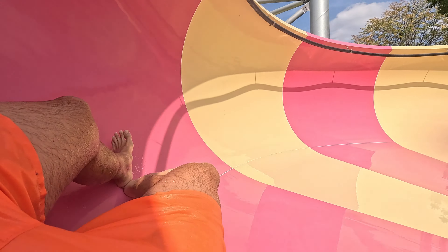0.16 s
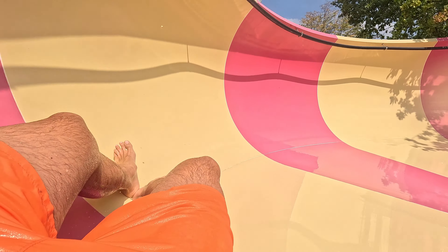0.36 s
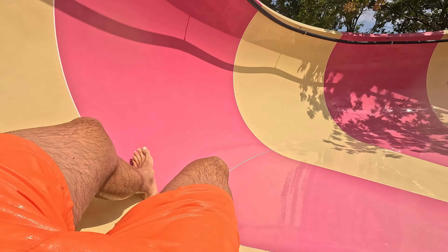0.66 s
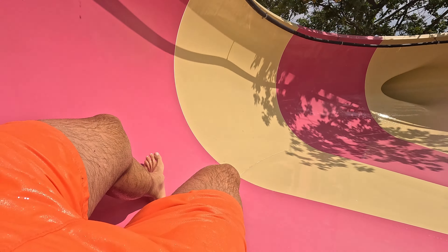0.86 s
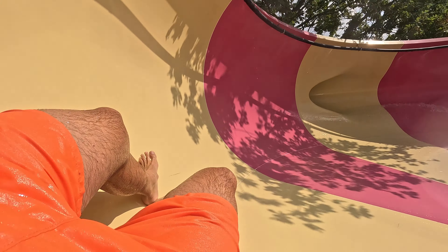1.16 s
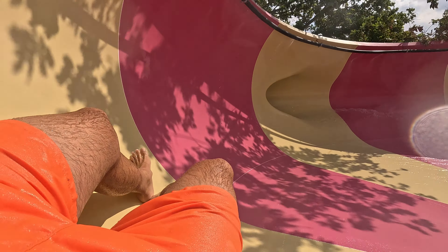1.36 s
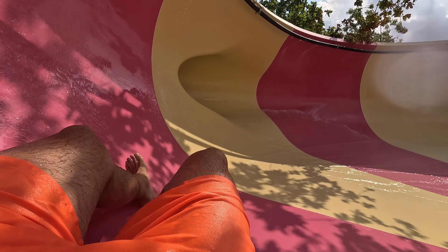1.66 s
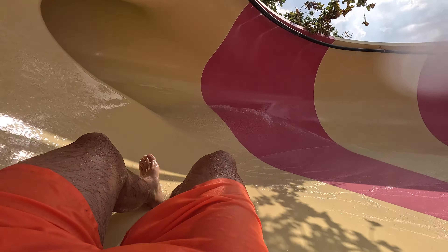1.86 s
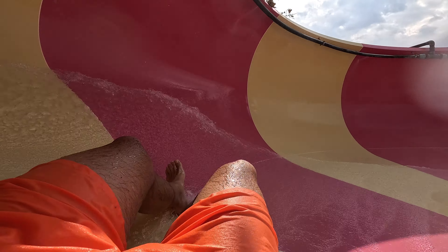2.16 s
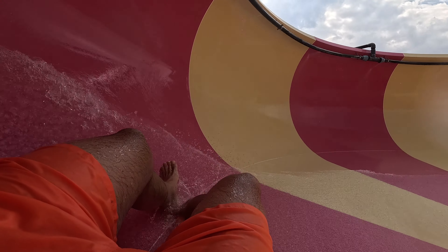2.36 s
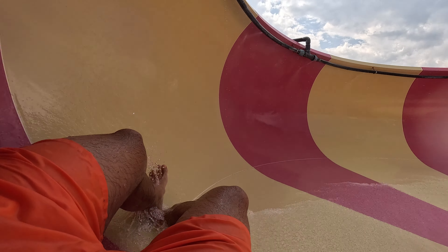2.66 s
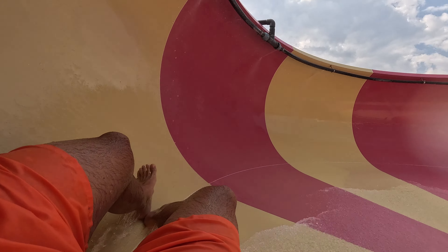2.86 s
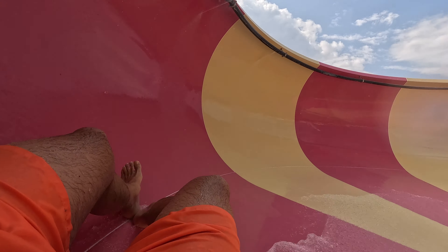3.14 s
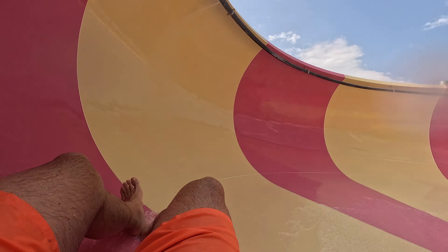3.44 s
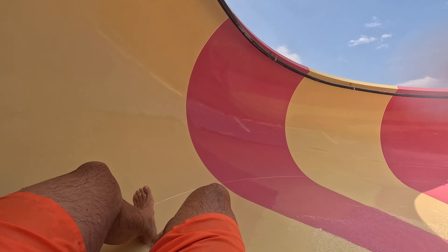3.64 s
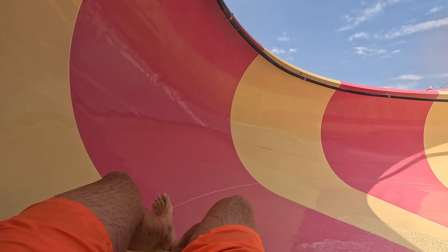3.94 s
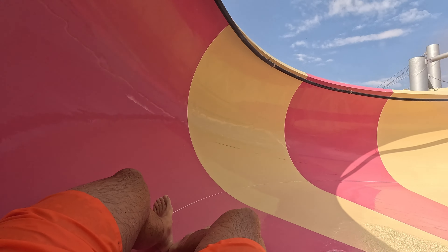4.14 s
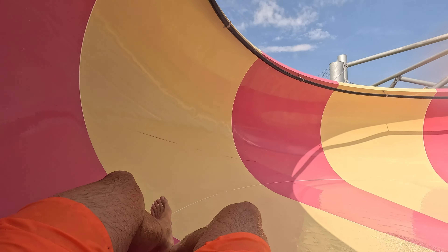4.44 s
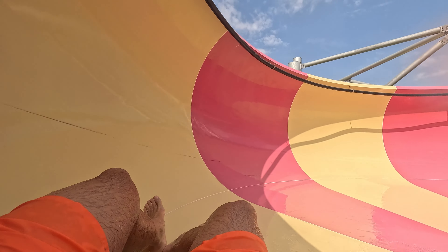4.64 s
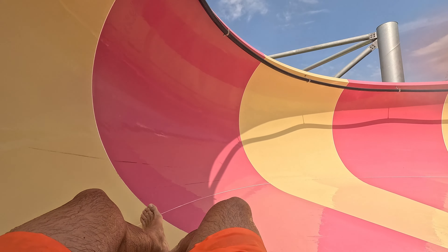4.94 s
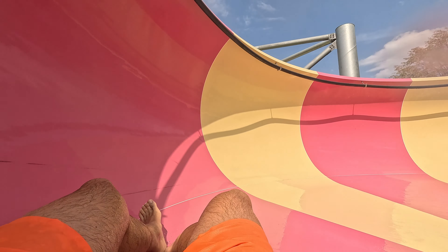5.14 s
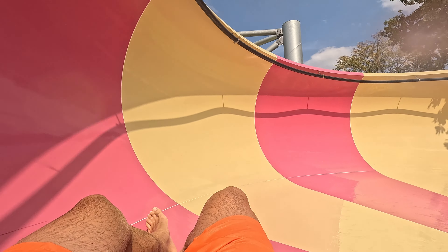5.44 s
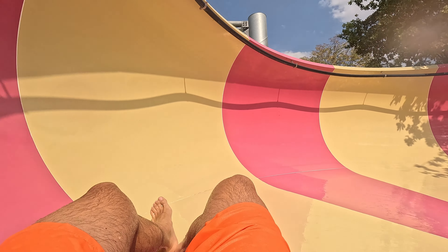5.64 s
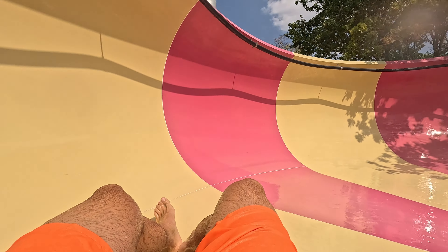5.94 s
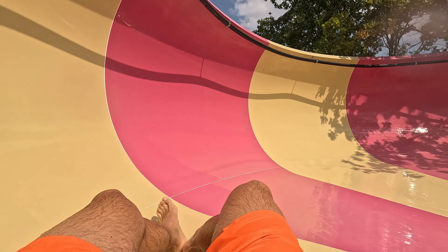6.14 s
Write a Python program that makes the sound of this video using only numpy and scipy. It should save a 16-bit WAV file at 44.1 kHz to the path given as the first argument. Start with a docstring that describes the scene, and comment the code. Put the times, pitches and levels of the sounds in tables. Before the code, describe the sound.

Heavy low wavering rumble of a slide shell under steady sloshing water, with busy splashy thumps and bubbling gulps early, calmer toward the end.

```python
"""A rider slides down an open fibreglass flume, heard by a small wet camera.
From the start the shell drums and booms under the body: low wavering notes in filtered noise.
Water sloshes, rushes, froths and sprays over it, as bands of noise roughened by small bubbles.
Soon waves thump the legs and air pockets gulp: short damped sines with puffs of noise.
A faint high hiss, made of filtered noise, rises in the second half."""
import sys
import numpy as np
from scipy import signal
from scipy.fft import rfft, irfft, next_fast_len
from scipy.io import wavfile
from scipy.ndimage import uniform_filter1d, minimum_filter1d, map_coordinates

SR = 44100
rng = np.random.default_rng(int(sys.argv[2]) if len(sys.argv) > 2 else 0)


def generate_wav(signal):
    """Clip the signal to [-1, 1] and save it as 16-bit WAV at the path in sys.argv[1]."""
    frames = np.transpose(np.atleast_2d(signal))
    scaled = np.clip(frames, -1, 1) * 32767
    pcm = np.round(scaled).astype(np.int16)
    wavfile.write(sys.argv[1], SR, pcm)


N = 277609

# Tone colour of rushing water and of foam. Each row: frequency in Hz, relative level in dB per Hz.
RUSH_COLOUR = [(250, -26), (420, -14.5), (492, 2), (663, 2.5), (938, 0.5), (1200, -7.5), (1560, -44.5),
               (2640, -120)]
UNREST_DB = -1  # scale of the random wander of the steady shell levels


def amp(db):
    """Turn decibels into gain."""
    return 10 ** (np.asarray(db) / 20)


def unit(x):
    """Scale x to an rms of 1."""
    return x / np.sqrt(np.mean(x ** 2) + 1e-20)


def noise():
    """White noise for the whole scene."""
    return rng.standard_normal(N)


def curves(rows):
    """Join the rows by straight lines: one curve for each column after the time."""
    s, *columns = np.transpose(rows)
    return [np.interp(np.arange(N) / SR, s, column) for column in columns]


def wobble(rate):
    """A smooth random curve through `rate` random points a second."""
    return map_coordinates(rng.standard_normal(1000), [np.arange(N) * rate / SR])


def filtered(x, response):
    """Multiply the spectrum of x by a gain that depends on frequency."""
    m = next_fast_len(N + SR // 2)
    gain = response(np.fft.rfftfreq(m, 1 / SR))
    return irfft(rfft(x, m) * gain, m)[..., :N]


def coloured(x, spectrum):
    """Shape x by (Hz, dB) points joined on a log frequency axis, then scale to rms 1."""
    f, db = np.transpose(spectrum)
    return unit(filtered(x, lambda hz: amp(np.interp(np.log(hz + 1), np.log(f + 1), db))))


def patchy(depth_db):
    """White noise whose gain varies in small patches of time and frequency."""
    z = signal.stft(noise(), nperseg=512)[2]
    field = uniform_filter1d(rng.standard_normal(z.shape), size=5, axis=0)
    field = uniform_filter1d(field, size=8, axis=1)
    patches = z * amp(depth_db * unit(field))
    return unit(signal.istft(patches, nperseg=512)[1][:N])


def evened(x, share, seconds):
    """Divide out part of the slow swelling of x, then scale to rms 1."""
    size = max(int(seconds * SR), 1)
    swell = np.sqrt(np.abs(uniform_filter1d(x ** 2, size=size)) + 1e-9)
    return unit(x / swell ** np.clip(share, 0, 1))


def strength(x, size):
    """Moving rms of x over `size` samples."""
    return np.sqrt(np.abs(uniform_filter1d(x ** 2, size=size)))


def swells(events):
    """Gain of (start, length, dB) swells added in power; the shortest stay below their full level."""
    t = np.arange(N) / SR
    ramp_s = 0.055  # rise and fall, each centred on its end of the swell
    power = 0
    for s, length, db in events:
        shape = np.clip(np.minimum(t - s, s + length - t) / ramp_s + .5, 0, 1)
        power = power + (amp(db) * shape) ** 2
    return np.sqrt(power)


def rings(s, db, hz, t60, rise, attack, size):
    """Damped sines that lose 60 dB in t60 seconds; their pitch shifts by the share 2 * rise in that time."""
    t = np.arange(size) / SR
    t60 = np.maximum(t60, 1e-3) * np.ones(len(s))
    s, db, hz, t60 = (np.asarray(v)[:, None] for v in (s, db, hz, t60))
    shape = amp(-60 * t / t60) * (1 - np.exp(-t / attack))
    shape = shape / shape.max(axis=1, keepdims=True)
    wave = amp(db) * shape * np.sin(2 * np.pi * hz * t * (1 + rise * t / t60))
    where = (s * SR).astype(int) + np.arange(size)
    return np.bincount(where.ravel(), wave.ravel(), N + size)[:N]


def wavering_tone(hz, waver):
    """A sine of rms 1 whose pitch and level wander at random."""
    phase = 2 * np.pi * np.cumsum(hz * (1 + waver * wobble(12))) / SR
    return unit(np.sin(phase) * amp(1.1 * wobble(8.3)))


def shell_drum():
    """The body drags over the fibreglass: a wavering low note in rumble, louder when pressed harder."""
    # Steady drumming. Each row: time in seconds, level in dB, pitch in Hz before it wavers.
    drum_rows = [(0, -21.5, 59.84), (.85, -23, 57.18), (.93, -24.5, 91.77), (1.25, -24.5, 83.7),
                 (1.42, -22.5, 53.83), (1.97, -21.5, 75.38), (2.03, -20.5, 48.17), (2.12, -23, 51.3),
                 (2.5, -23.5, 52.97), (2.7, -21.5, 62.54), (3.2, -26.5, 64.16), (3.31, -21, 83.03),
                 (3.4, -23, 62.04), (3.48, -21, 54.8), (3.55, -24, 62.4), (3.61, -26, 47.45),
                 (3.87, -21.5, 52.98), (4.0, -24, 69.85), (4.2, -29.5, 69.2), (4.3, -25, 56.26),
                 (4.6, -24, 52.46), (4.78, -26.5, 54.44), (4.85, -25, 75), (4.92, -23.5, 65.5),
                 (4.97, -27.5, 50.17), (5.33, -27.5, 51.46), (5.45, -26.5, 64.2), (5.75, -25, 50.25),
                 (5.95, -27, 77.8), (6.29, -27.5, 60.5)]
    # Tone colour of the rumble. Each row: frequency in Hz, relative level in dB per Hz.
    rumble_colour = [(8.8, -27), (15, 0), (59, 1), (110, -5), (140, -31), (240, -120)]
    # Body pressed harder on the shell. Each row: start in seconds, length in seconds, full level in dB.
    surge_rows = [(.08, 0.061, -30.5), (.565, .035, -16), (.625, 0.023, -21.5), (.665, .035, -19.5),
                  (.85, 0.071, -21.5), (.93, 0.13, -26.5), (1.19, 0.11, -22.5), (1.65, 0.072, -22),
                  (1.945, 0.086, -17), (2.083, 0.052, -21), (2.308, 0.14, -24), (2.66, 0.024, -20.5),
                  (2.73, 0.055, -19.5), (2.85, 0.07, -18.5), (3.06, 0.061, -20), (3.31, .1, -18.5),
                  (3.464, 0.027, -19), (3.52, 0.058, -16.5), (3.59, .1, -18.5), (3.8, 0.069, -27),
                  (4.005, 0.089, -22.5), (4.178, 0.045, -18.5), (4.29, .06, -20.5), (4.63, .1, -23),
                  (4.8, 0.1, -23.5), (5.4, 0.2, -25), (5.72, 0.043, -19), (6.0, 0.077, -26.5),
                  (6.19, 0.034, -23)]
    steady_note_db, surge_rumble_db = -7.5, -5  # note under steady rumble; rumble under a surge's note

    drum_db, drum_hz = curves(drum_rows)
    note = wavering_tone(drum_hz, 0.039)
    # the rumble's loudness is steadier than free noise
    rumble = evened(coloured(noise(), rumble_colour), 0.81, 0.079)
    steady = amp(drum_db + UNREST_DB * wobble(9.2))
    surge = swells(surge_rows)
    note_gain = np.hypot(amp(steady_note_db) * steady, surge)
    rumble_gain = np.hypot(steady, amp(surge_rumble_db) * surge)
    drum = note_gain * note + rumble_gain * rumble
    drum_level = np.hypot(steady, surge)
    return drum_level * evened(drum / drum_level, 0.7, 0.044)


def shell_panel():
    """A panel of the shell booms as resonant noise and at times rings up on a wavering note."""
    # Steady boom. Each row: time in seconds, level in dB.
    boom_rows = [(0, -41), (.5, -30), (.97, -35.5), (1.3, -34.5), (2.4, -29), (3.4, -33.5), (3.7, -40.5),
                 (4.1, -34), (4.7, -33), (6.29, -35.5)]
    # Resonances of the panel. Each row: centre in Hz, width in Hz, relative level in dB.
    panel_modes = [(126.7, 18, -3), (122, 65, -3)]
    # Panel rings up. Each row: start in seconds, length in seconds, full level in dB.
    flex_rows = [(.134, 0.05, -22.5), (.23, 0.15, -25.5), (.48, 0.04, -28), (1.05, 0.14, -25),
                 (1.277, 0.023, -20.5), (1.357, 0.039, -26.5), (1.69, 0.061, -27), (1.98, 0.04, -22.5),
                 (2.05, 0.036, -20.5), (2.295, .047, -27.5), (2.6, 0.12, -28.5), (2.97, 0.076, -24),
                 (3.14, .08, -28.5), (3.255, 0.093, -24.5), (3.42, 0.048, -26), (4.0, .14, -29),
                 (4.3, .23, -26.5), (5.0, 0.065, -30), (5.28, 0.054, -26.5), (6.1, 0.1, -31.5)]
    panel_hz, flex_noise_db = 131, -4  # middle of the wandering pitch; noise under the ring

    def resonance(f):
        return sum(amp(db) * np.exp(-((f - c) / w) ** 2) for c, w, db in panel_modes)

    ring = wavering_tone(panel_hz * (1 + .04 * wobble(4.3)), .025)
    # the boom's loudness is partly evened too
    boom = evened(filtered(noise(), resonance), 0.5, 0.038)
    steady = amp(curves(boom_rows)[0] + UNREST_DB * wobble(12))
    flex = swells(flex_rows)
    boom_gain = np.hypot(steady, amp(flex_noise_db) * flex)
    panel_level = np.hypot(boom_gain, flex)
    return panel_level * evened((boom_gain * boom + flex * ring) / panel_level, 0.43, 0.027)


def small_bubbles():
    """Many small bubbles ring at random times, higher ones dying sooner, each rising in pitch."""
    draw = rng.standard_normal((2500, 3))
    when = rng.random(len(draw)) * N / SR
    hz = 800 * np.exp(0.399 * draw[:, 0])
    bubbles = rings(when, 3 * draw[:, 1], hz, 14 / hz, rise=.15, attack=0.0039, size=1900)
    return coloured(bubbles, [(400, -23.5), (550, -7.0), (1200, -9.0), (1900, -19.0)])


def water():
    """Slosh, rush, froth and spray are noise bands sharing fast surges; small bubbles roughen the rush."""
    # Main body of water. Each row: time in seconds, slosh level in dB, rush level in dB.
    water_rows = [(0.03, -22.5, -29.5), (0.05, -29.5, -33), (0.48, -28, -28.5), (0.88, -30, -32.5),
                  (1.2, -29, -30), (1.62, -30, -35.5), (2.17, -26, -32), (2.3, -28, -33.5),
                  (2.43, -26, -27.5), (2.8, -29.5, -28.5), (3.17, -30, -33), (3.59, -36.5, -37.5),
                  (4.03, -32, -37), (4.2, -34, -34.5), (4.46, -33, -34.5), (4.6, -33.5, -35),
                  (4.76, -35, -35), (5.1, -34, -36), (5.5, -31.5, -36), (5.92, -33.5, -35.5),
                  (6.14, -30.5, -36), (6.29, -33.5, -36)]
    # Broken water. Each row: time in seconds, froth level in dB, spray level in dB.
    foam_rows = [(0.03, -39, -50.5), (0.17, -38.5, -52.5), (0.29, -35.5, -52), (0.44, -38.5, -53.5),
                 (0.56, -44.5, -54), (0.85, -43, -52.5), (1.35, -46, -51.5), (1.49, -41, -52.5),
                 (1.55, -44, -53), (2.19, -46.5, -54), (2.33, -39, -49.5), (2.46, -40.5, -50),
                 (2.6, -37.5, -49.5), (2.77, -39.5, -50.5), (3.52, -48, -57.5), (4.6, -49, -57),
                 (5.4, -52.5, -58.5), (6.29, -50, -56.5)]
    # Tone colours of the water. Each row: frequency in Hz, relative level in dB per Hz.
    slosh_colour = [(88, -41), (150, 0.5), (190, -1), (260, -5.5), (460, -10.5), (600, -39.5), (1010, -120)]
    froth_colour = [(900, -35.5), (1150, -4.5), (1500, -8), (1750, -12.5), (1950, -21), (2300, -36),
                    (4000, -120)]
    spray_colour = [(1500, -41), (1900, -3), (2250, -1.5), (2700, -12), (3050, -13), (3550, -12),
                    (3900, -20), (4600, -22), (5200, -29.5), (6000, -31), (7500, -46), (8000, -47.5),
                    (10500, -57), (12000, -120)]

    slosh_db, rush_db = curves(water_rows)
    froth_db, spray_db = curves(foam_rows)
    surge = wobble(16)
    slosh = evened(coloured(patchy(0.15), slosh_colour), 0.55, 0.065)
    rush = unit(coloured(patchy(0.97), RUSH_COLOUR) + amp(-6.5) * small_bubbles())
    froth = coloured(patchy(1.2), froth_colour)
    spray = evened(coloured(patchy(0.3), spray_colour), 0.095, 0.016)
    return (slosh * amp(slosh_db + 1.5 * surge)
            + rush * amp(rush_db + 0.3 * surge + 0.9 * wobble(6))
            + froth * amp(froth_db + 0.25 * surge)
            + spray * amp(spray_db + 0.54 * surge))


def thumps():
    """Waves thump the legs and the wall: two falling damped tones and a puff of broken water each."""
    # Wave blows. Each row: start in seconds, peak level of the lower tone in dB, its first pitch in Hz.
    thump_rows = [(0.104, -19, 141), (0.247, -14, 149), (0.285, -15, 145), (0.385, -18.5, 173),
                  (0.399, -12, 177), (0.424, -13.5, 187), (0.46, -15.5, 246), (0.489, -15.5, 142),
                  (0.356, -16, 332), (0.534, -23.5, 331), (0.607, -13.5, 189), (0.738, -19.5, 331),
                  (0.748, -13.5, 235), (0.756, -16, 320), (1.514, -12, 187), (1.519, -13.5, 290),
                  (1.705, -18, 140), (1.86, -24.5, 230), (2.565, -20.5, 168), (1.921, -12.5, 196),
                  (2.02, -15, 274), (2.065, -13, 151), (2.081, -9, 161), (2.101, -10.5, 199),
                  (2.246, -20.5, 298), (2.258, -12, 199.5), (2.031, -19, 435), (2.092, -15, 299),
                  (2.078, -17, 381), (2.107, -19, 425), (3.098, -15.5, 229.5), (3.115, -18.5, 286),
                  (3.293, -14.5, 143), (4.093, -24, 179.5), (4.75, -24, 185), (5.3, -26.5, 166),
                  (5.568, -22, 215), (6.11, -24.5, 208), (6.185, -20, 176)]
    # Tone colour of a wave breaking on skin. Each row: frequency in Hz, relative level in dB per Hz.
    slap_colour = [(120, -35), (220, 13.5), (500, -6), (900, -5), (1400, -18), (3000, -90.5)]

    s, db, hz = np.transpose(thump_rows)
    blows = 0
    for ratio, up_db in [(1, 0), (1.608, -12)]:  # pitch ratio and level in dB of each tone
        blows = blows + rings(s, db + up_db, hz * ratio, 0.041, rise=-0.069, attack=0.0017, size=4000)
    push = strength(blows, 260)  # the puff follows the blow's strength
    return blows + amp(-9.0) * push * coloured(noise(), slap_colour)


def gulps():
    """Large air pockets ring briefly with rising pitch, and foam fizzes around each one."""
    # Large bubbles. Each row: start in seconds, peak level in dB, first pitch in Hz.
    gulp_rows = [(0.296, -18.5, 998), (0.298, -25.5, 1340), (0.508, -22.5, 1014), (0.383, -23, 750),
                 (0.488, -23.5, 658), (0.538, -22.5, 647), (0.625, -21.5, 898), (0.673, -18, 705),
                 (1.064, -21, 710), (1.09, -21.5, 725), (1.399, -24.5, 794), (1.43, -22.5, 965),
                 (1.508, -25.5, 890), (1.694, -22.5, 590), (1.735, -22.5, 600), (1.828, -24.5, 597),
                 (1.899, -20.5, 703), (2.025, -19, 607), (2.101, -19, 633), (0.571, -24, 800),
                 (2.157, -23.5, 560), (2.292, -22.5, 634), (2.31, -22, 696), (2.417, -23, 746),
                 (2.444, -21, 870), (2.488, -22.5, 693), (2.562, -19.5, 870), (2.575, -21.5, 935),
                 (2.73, -22, 955), (2.745, -19.5, 654), (2.785, -24, 720), (2.795, -24.5, 1240),
                 (2.851, -23.5, 896), (4.026, -19.5, 720)]
    pockets = rings(*np.transpose(gulp_rows), 0.031, rise=0.051, attack=0.0012, size=4000)
    fizz = strength(pockets, 200) * coloured(noise(), RUSH_COLOUR)
    return pockets + amp(-7) * fizz


def hiss():
    """Smooth, faint noise at the very top of the treble, too weak to hear at first."""
    # Rise of the hiss. Each row: time in seconds, level in dB before the top is cut off.
    hiss_rows = [(3.0, -102), (3.3, -83), (4.2, -67), (6.0, -67), (6.1, -70.5)]
    # Tone colour of the hiss. Each row: frequency in Hz, relative level in dB per Hz.
    thin_colour = [(9000, -90), (10700, -34), (11500, -9), (12100, 0), (12600, 1), (13200, -2), (15750, -2)]
    return amp(curves(hiss_rows)[0]) * coloured(noise(), thin_colour)


def scene():
    """Add all layers at one microphone."""
    shell = shell_drum() + shell_panel()
    return (shell + water() + thumps() + gulps() + hiss())[None]


def record(dry):
    """The camera turns down around the highest low-pitched peaks and cuts all above its band limit."""
    ceiling, top_hz = .52, 15750  # soft limit where full scale is 1; band limit in Hz
    bass = filtered(dry, lambda hz: hz < 1500)
    gain = (1 + np.abs(bass / ceiling) ** 4) ** -.25
    gain = uniform_filter1d(minimum_filter1d(gain, size=441), size=441)  # hold and smooth over 10 ms
    return filtered(dry * gain, lambda hz: hz < top_hz)


dry = scene()
out = record(dry)
generate_wav(out)
```